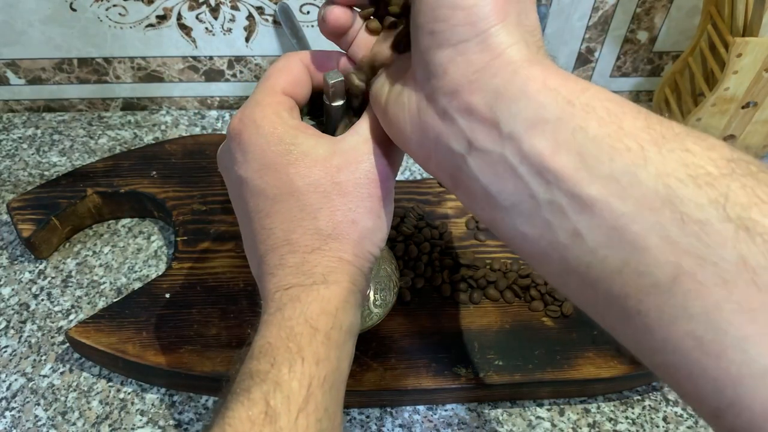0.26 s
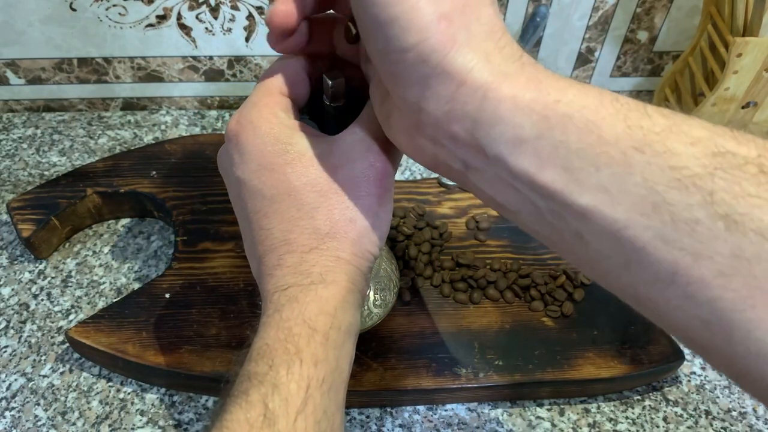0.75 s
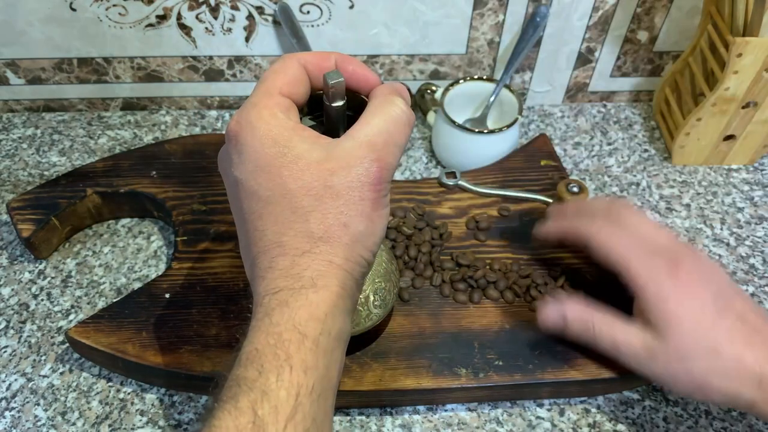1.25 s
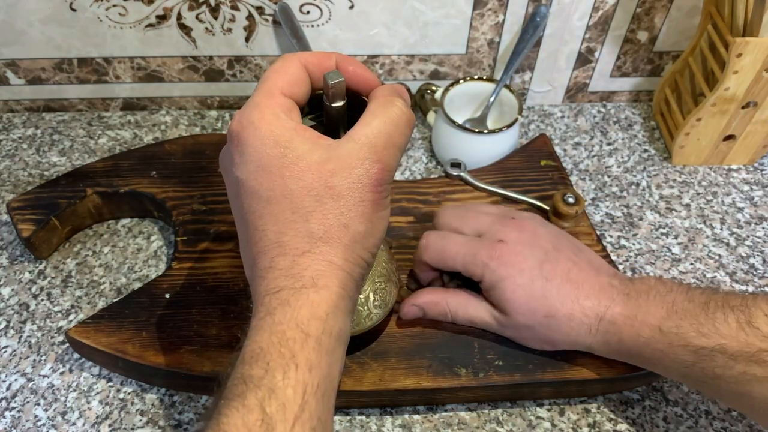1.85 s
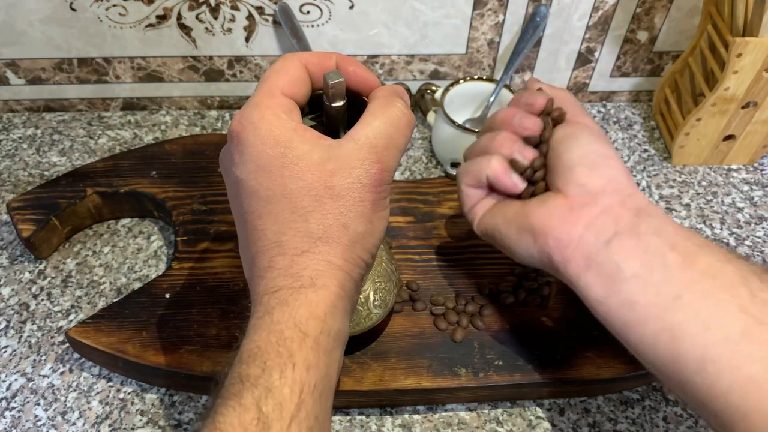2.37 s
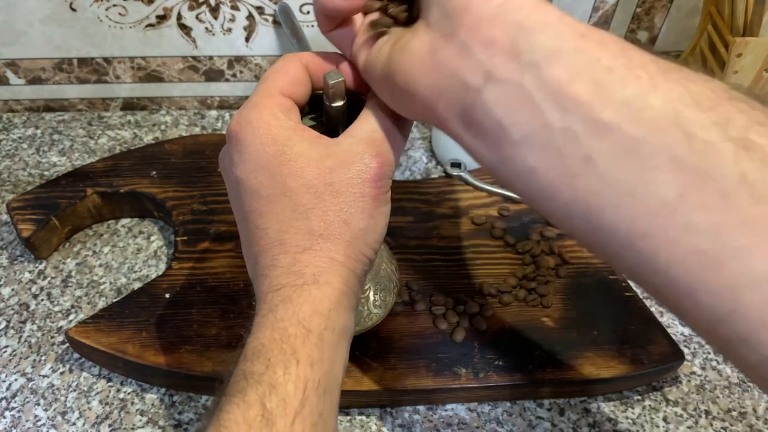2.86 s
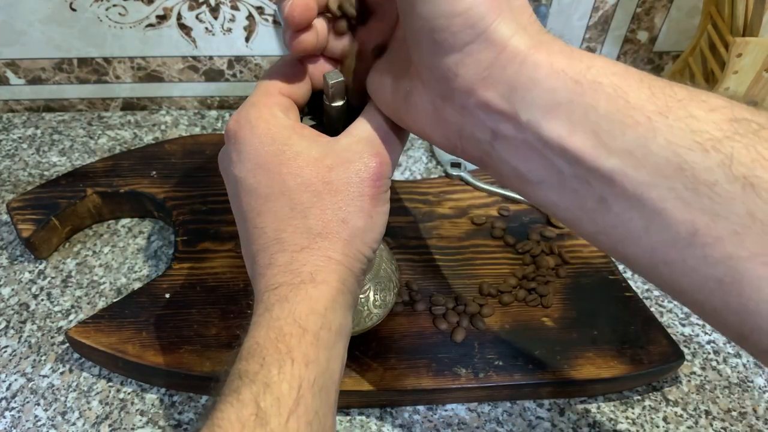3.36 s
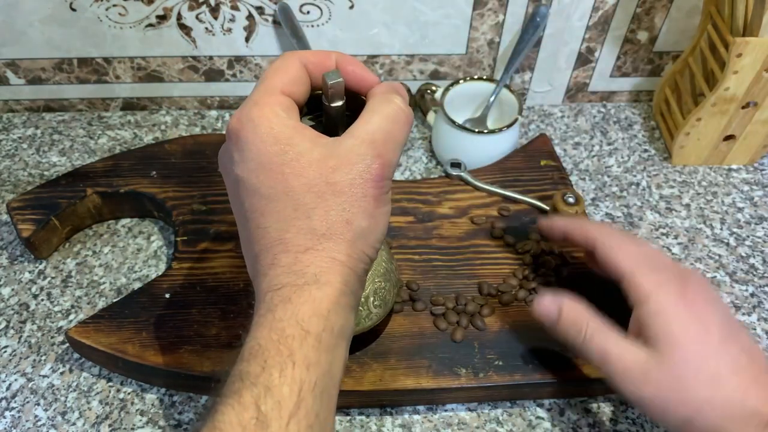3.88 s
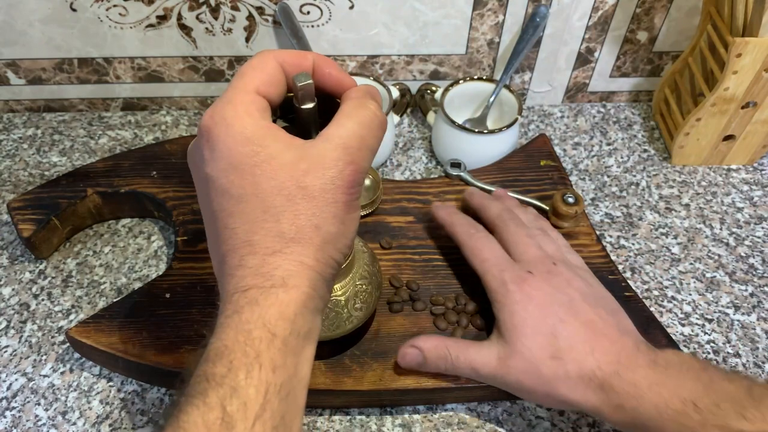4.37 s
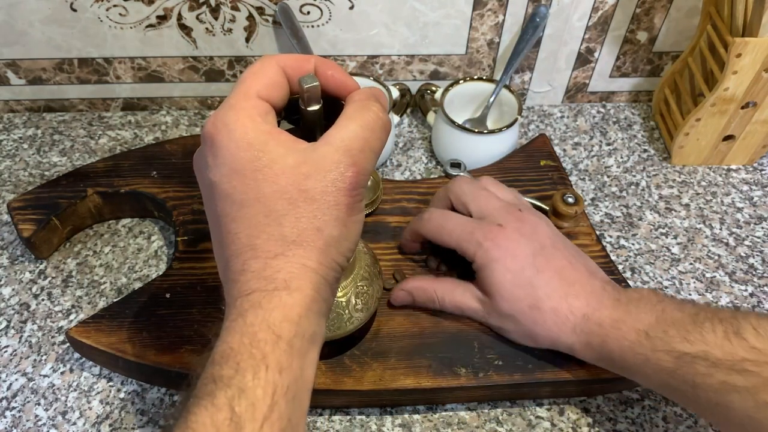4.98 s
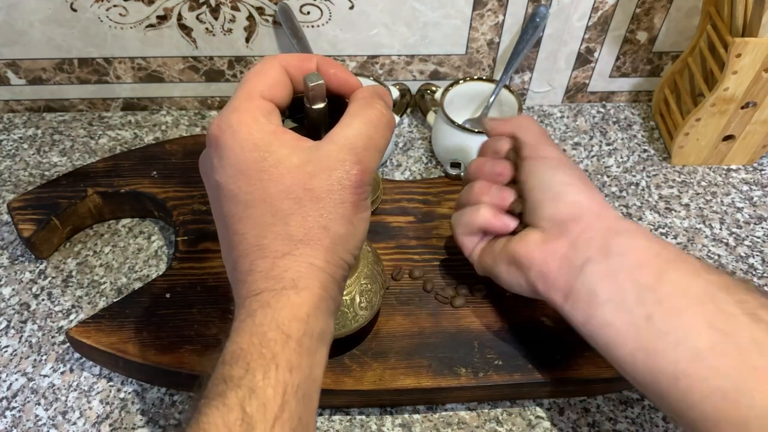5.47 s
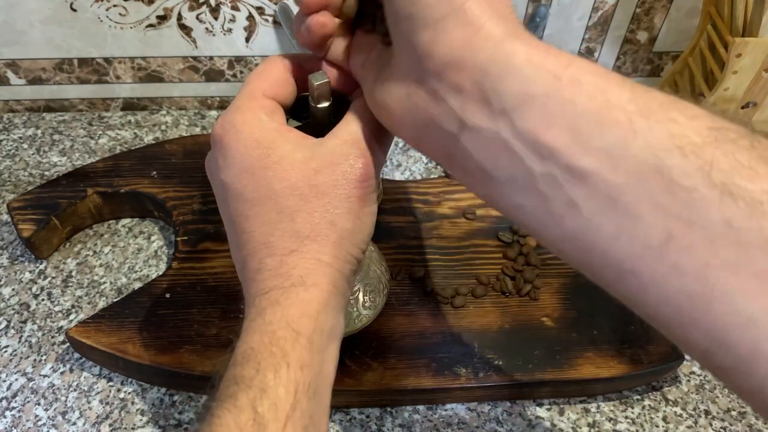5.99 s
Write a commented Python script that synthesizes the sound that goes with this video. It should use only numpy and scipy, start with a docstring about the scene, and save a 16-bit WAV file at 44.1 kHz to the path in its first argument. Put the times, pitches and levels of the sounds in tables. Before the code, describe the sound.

Close, crisp clatter of beans dropping into a metal tube in three bursts, separated by quiet gritty scraping and dull bumps on wood.

```python
"""Coffee beans drop by the handful into a hand-held brass grinder: clicks strike decaying tube resonances.
Between pours a hand sweeps beans over the wooden board (random grit), beans tap it, and the hand bumps it.
Filtered noise makes the board's rumble, short diffuse reflections off the counter and tiles, and the room's hush.
A close two-port microphone adds phase shifts and unlike scatter; its right port gets the treble slightly first."""
import sys
import numpy as np
from scipy import signal
from scipy.fft import rfft, irfft
from scipy.io import wavfile
from scipy.ndimage import uniform_filter1d

SR = 44100
rng = np.random.default_rng(int(sys.argv[2]) if len(sys.argv) > 2 else 0)


def wav_out(sig):
    """Save sig, one row per channel (or a flat mono array), as 16-bit PCM at SR to the path in sys.argv[1]."""
    wavfile.write(sys.argv[1], SR, np.round(np.clip(np.atleast_2d(sig).T, -1, 1) * 32767).astype(np.int16))


N = 274743

RISE_POWER, FALL_POWER = 0.6, 0.87  # 1 = straight, less = rounder, more = peakier
# Flurries of small contacts as a handful runs out. Each row: start in s, rise in s, fall in s, level in dB.
POURS = [(-0.1, 0.075, 0.18, -48.5), (0.17, .04, .08, -60), (0.24, .14, 0.065, -49.5),
         (0.4, 0.14, 0.48, -65), (0.58, 0.064, 0.08, -51.5), (0.7, 0.077, 0.13, -49),
         (0.9, .1, 0.13, -74.5), (3.0, 0.089, 0.063, -54), (3.13, 0.19, 0.092, -48),
         (3.44, 0.05, .12, -50.5), (6.06, 0.23, .2, -47)]


def pour_gain():
    """Strength of the falling stream of beans."""
    return swells(POURS, column=3)


# Bean hits that stand out. Each row: time in s, level in dB, hollow knock in dB against the tick,
# treble slant in dB per 4 kHz about 11 kHz.
BEAN_HITS = [(0.0094, -19, -25.5, -3), (0.021, -22.5, -35.5, -4), (0.0298, -15.5, -44, 8),
             (0.0445, -11.5, -33, -3), (0.0606, -26, -32, 0), (0.0926, -17, -41, 8), (0.107, -30, -29, 19),
             (0.1189, -12, -41, -1), (0.1509, -9, -36.5, 2), (0.1815, -18.5, -34, 4),
             (0.2455, -15, -28.5, -1), (0.2711, -15.5, -27.5, 9), (0.2786, -21.5, -24.5, 5),
             (0.288, -22, -34.5, 3), (0.3135, -25.5, -26, 2), (0.3266, -24.5, -29, -4),
             (0.3403, -16, -28.5, -2), (0.3509, -11.5, -37, 0), (0.38, -12.5, -43, 4),
             (0.386, -14.5, -41, 9), (0.399, -14, -41, 0), (0.4072, -21, -42, 6), (0.4134, -27, -47, 10),
             (0.4496, -18, -45, 2), (0.458, -30, -28, 3), (0.5121, -22, -30.5, -4),
             (0.5448, -21.5, -29, -5), (0.594, -17, -31, 2), (0.6304, -14, -44.5, 14),
             (0.6476, -20, -46, 5), (0.6636, -14, -39, 16), (0.6757, -22, -41, 2), (0.6804, -17, -47, 14),
             (0.7196, -17.5, -26, -9), (0.7274, -18.5, -27.5, -8), (0.7354, -18.5, -27, -7),
             (0.745, -23.5, -24.5, 0), (0.7555, -15, -31.5, 0), (0.7674, -16, -33.5, 9),
             (0.7857, -12.5, -40, 11), (0.791, -24, -25.5, -1), (0.8126, -21, -42.5, -16),
             (0.8277, -12.5, -33.5, -2), (0.8664, -34, -43, 8), (0.8869, -19, -45, -3),
             (0.8948, -24.5, -28, -4), (0.9193, -35.5, -25, -8), (0.9464, -58, -15, -2),
             (0.9731, -17, -24.5, -13), (1.0083, -30.5, -26, -8), (1.037, -31, -31, 0),
             (1.0588, -39.5, -41, -7), (1.5361, -44, -20, 20), (1.8198, -39, -32, 6), (1.889, -37, -18, 12),
             (2.0587, -35, -18.5, -2), (2.117, -55, -14.5, -1.5), (2.4024, -47.5, -32.5, -11),
             (2.4258, -46, -31, 4), (2.4416, -41.5, -27, 7), (2.4614, -21.5, -43, 29.5),
             (2.4742, -31, -37, 3), (2.5146, -33.5, -37, 6), (2.6394, -36, -56, -5.5),
             (2.6681, -35, -46, -9.5), (2.819, -55, -33, -2.5), (2.9015, -60, -32.5, 0.5),
             (3.0068, -23, -21, -7.5), (3.0355, -25, -27.5, -7), (3.048, -38, -33, 4),
             (3.0644, -41, -36.5, -4), (3.0785, -34, -45, 8), (3.0888, -21.5, -31, -6),
             (3.1134, -28, -40, 2), (3.1208, -24, -47, 8), (3.1457, -19, -33, 1), (3.1519, -16, -28, 12),
             (3.168, -19.5, -45.5, -2), (3.1826, -16.5, -27.5, 8), (3.2166, -19, -25.5, -6),
             (3.2249, -20.5, -32.5, 8), (3.2359, -20, -43, -7), (3.249, -22, -43, 8),
             (3.2571, -16, -24.5, -6), (3.271, -19, -37, 7), (3.279, -15, -44.5, 9),
             (3.303, -22.5, -43, -10), (3.318, -21, -61, 9), (3.334, -25.5, -41, 12),
             (3.3623, -22.5, -20, -15), (3.3841, -17.5, -31, -7), (3.3947, -15.5, -26, -4),
             (3.4164, -17.5, -37, 9), (3.4304, -21, -30.5, 10), (3.4359, -13, -35.5, -2),
             (3.46, -21, -39, 7), (3.491, -23.5, -27, -3), (3.5126, -11.5, -31, 5),
             (3.526, -15.5, -26, -10), (3.5534, -33.5, -18, 1.5), (3.5643, -32, -22.5, -12.5),
             (3.6516, -24, -36, 6), (4.2822, -54, -14, 5), (4.5111, -33.5, -18, 12),
             (5.0203, -24, -22.5, 6), (5.0719, -29, -43, 14), (5.0973, -35.5, -19.5, 3),
             (5.1646, -27.5, -48, 0), (5.3431, -40, -26, -13), (5.5581, -50, -18.5, -3),
             (5.5892, -33.5, -40, 11), (5.6136, -42, -37, -2), (5.6241, -30.5, -41, 4),
             (6.0183, -34.5, -55, -4), (6.0507, -38, -51, -8), (6.0695, -21, -26.5, 0),
             (6.0791, -23, -29, 0), (6.106, -44, -36, 0), (6.129, -19, -23, -1), (6.1399, -13, -29.5, 2),
             (6.1744, -20, -26.5, -2), (6.187, -17, -43, -5), (6.2048, -25, -48, 2)]
# Damped brass tube and beans, tick part. Each row: frequency in Hz, width in Hz, relative level in dB.
TICK_MODES = [(4680, 640, -20), (6740, 230, -34.5), (7850, 420, -3.5), (9210, 230, -4.5), (10250, 420, -1),
              (11630, 830, 3.5), (12870, 550, 1), (14100, 430, 1.5), (16000, 700, 0)]
# Hollow knock of the tube. Each row: frequency in Hz, width in Hz, relative level in dB.
KNOCK_MODES = [(780, 930, -1), (1430, 880, -2), (2210, 233, 0.5), (2514, 142, 2), (3000, 98, -6),
               (4340, 1200, -11.5)]
MODE_CHANCE_DB = 3.0  # spread of a mode's strength from hit to hit
CHATTER_T60_S, REBOUNDS_PER_S, REBOUND_SPREAD_DB = 0.021, 900.0, 2.0


def beans(pour):
    """Hits and stream strike every tube mode; rows: direct sound, scatter to left port, to right port."""
    time_s, level_db, knock_db, slant_db = np.transpose(BEAN_HITS)
    at = sample_of(time_s)
    modes = TICK_MODES + KNOCK_MODES
    chance_db = MODE_CHANCE_DB * rng.standard_normal((len(at), len(modes), 3))
    stream = pour * grains(per_s=300.0, spread_db=2.0)
    rebounds = 0.4 + 0.66 * np.abs(grains(REBOUNDS_PER_S, REBOUND_SPREAD_DB))
    chatter = rebounds * rng.standard_normal((6, N))
    tick, knock = np.zeros((3, N)), np.zeros((3, N))
    for k, (hz, width_hz, mode_db) in enumerate(modes):
        hollow = k >= len(TICK_MODES)
        if hollow:
            body_db, stream_db = knock_db + 3, -24
        else:
            slant = np.clip((hz - 11000) / 4000, -.5, .5)  # hard, glancing hits favour the top modes
            body_db, stream_db = slant * slant_db - 7, -8
        clicks = np.tile(amp(stream_db) * stream, (3, 1))
        clicks[:, at] += amp(level_db + body_db + chance_db[:, k].T)
        # dying chatter between bean and wall follows each contact
        trail = signal.lfilter([0, 1], [1, -decay(CHATTER_T60_S)], np.abs(clicks[0]))
        blows = clicks * [[.55], [.4], [-.4]] + 0.12 * trail * chatter[k % 2::2]
        rings = (-1) ** k * amp(mode_db) * resonance(blows, hz, width_hz)
        if hollow:
            knock += rings
        else:
            tick += rings
    return above(tick, hz=3750) + above(knock, hz=650)


RING_WIDTH_HZ, RING_TILT_DB_PER_OCTAVE = 350, 9


def bean_rings():
    """Each standout bean also rings briefly at one of 24 pitches, dealt at random."""
    time_s, level_db = np.transpose(BEAN_HITS)[:2]
    dealt = rng.integers(0, 24, len(time_s))
    rings = np.zeros(N)
    for k, hz in enumerate(np.geomspace(4500, 15500, 24)):
        ring_db = level_db - 6.5 + RING_TILT_DB_PER_OCTAVE * np.log2(hz / 10000)
        clicks = np.zeros(N)
        clicks[sample_of(time_s)] = amp(ring_db) * (dealt == k)
        rings += resonance(clicks, hz, RING_WIDTH_HZ)
    return above(rings, hz=3048) * [[1], [.6], [-.6]]


# Hand sweeping beans over wood. Each row: start in s, rise in s, fall in s, bright level in dB, dull level in dB.
SWEEPS = [(1.33, 0.078, 0.22, -72, -82.5), (1.5, 0.25, .12, -61.5, -61), (1.72, 0.19, .11, -50.5, -59),
          (2.0, 0.071, 0.12, -68, -67.5), (4.175, 0.024, .1, -65, -68), (4.28, 0.066, 0.056, -88, -69),
          (4.41, .06, 0.29, -60, -62.5), (4.62, 0.083, 0.084, -57.5, -62), (4.9, 0.13, 0.091, -53.5, -58.5),
          (4.98, 0.19, 0.16, -49, -60), (5.26, 0.061, 0.06, -68.5, -65.5), (5.57, 0.042, 0.052, -54.5, -80)]
# Bright sweep colour. Each row: frequency in Hz, relative density in dB per Hz.
SWEEP_COLOUR = [(3000, -8), (5000, -8.5), (7000, 0), (9500, -2), (12000, 2), (14500, 5.5), (16000, -3)]
# Board resonances, rubbed or tapped. Each row: frequency in Hz, width in Hz, relative level in dB.
SCRAPE_MODES = [(980, 930, -10.5), (1420, 360, -2.5), (2210, 450, -9), (2990, 840, 0.5), (3920, 200, -10)]
ROLLS_PER_S, ROLL_DB = 60.0, -5  # beans ticking as they roll under the hand


def sweeps():
    """Skin and rolling beans on wood: bright grit, and board resonances that come and go under the hand."""
    grit = grains(per_s=2700.0, spread_db=5.0) * rng.choice([-1, 1], (3, N))
    grit = grit + .5 * rng.standard_normal((3, N))
    grit += amp(ROLL_DB) * grains(ROLLS_PER_S, spread_db=2.0) * [[1], [.5], [-.5]]
    wood = np.zeros((3, N))
    for hz, width_hz, mode_db in SCRAPE_MODES:
        rubbed = rms_one(resonance(np.diff(grit, prepend=0), hz, width_hz))
        wood += amp(mode_db) * wobble(spread_db=5.0, hz=4.25) * rubbed
    dull = rms_one(above(wood, hz=670))
    bright = colour(grit * wobble(spread_db=1.5, hz=29.2), SWEEP_COLOUR)
    return swells(SWEEPS, column=3) * bright + swells(SWEEPS, column=4) * dull


# Loose beans tap the board. Each row: time in s, level in dB.
TAPS = [(2.142, -47), (2.2162, -54.5), (4.1574, -71), (4.4407, -34), (4.4814, -59), (5.3431, -46.5),
        (5.387, -60), (5.4066, -51)]
TAP_T60_S, TAP_CRACK_DB = 0.018, -9


def taps():
    """A short dying noise burst is heard directly and through the board's resonances."""
    burst = signal.lfilter([1], [1, -decay(TAP_T60_S)], impulses(TAPS)) * rng.standard_normal((3, N))
    rings = np.zeros((3, N))
    for hz, width_hz, mode_db in SCRAPE_MODES:
        rings += amp(mode_db - 11) * resonance(np.diff(burst, prepend=0), hz, width_hz)
    return above(rings + amp(TAP_CRACK_DB) * burst, hz=830)


# Heel of the hand lands on the board. Each row: time in s, level in dB.
BUMPS = [(4.159, -28.5), (4.437, -28.5)]
# Board on its feet. Each row: frequency in Hz, relative level in dB, 60 dB decay in s, delay in s.
BOARD_MODES = [(59.5, 0, 0.26, 0.0138), (113, -6.5, 0.33, 0.0013), (199.5, 4.5, 0.05, 0.00587),
               (422, -10.5, 0.077, 0.00618)]
# Loose things shaking after a bump. Each row: frequency in Hz, relative density in dB per Hz.
SHUDDER_COLOUR = [(80, -2), (200, 4.5), (420, 2.5), (700, -16), (1100, -41)]
PALM_HZ, SHUDDER_T60_S, SHUDDER_DB = 449, 0.25, -12.0


def bumps():
    """Soft blows ring the board's modes, each after its own delay; loose things shake along."""
    blows = impulses(BUMPS)
    rings = np.zeros((3, N))  # row 0 only: no scatter
    for hz, mode_db, t60_s, delay_s in BOARD_MODES:
        late = np.roll(blows, sample_of(delay_s))
        rings[0] += amp(mode_db) * resonance(late, hz, np.log(1000) / np.pi / t60_s)
    palm = signal.butter(2, PALM_HZ, fs=SR, output="sos")  # flesh cushions the contact
    dying = uniform_filter1d(signal.lfilter([1], [1, -decay(SHUDDER_T60_S)], blows), size=300)
    shudder = amp(SHUDDER_DB) * dying * colour(rng.standard_normal((3, N)), SHUDDER_COLOUR)
    return signal.sosfilt(palm, rings) + shudder


# Continuous rumble of the counter. Each row: time in s, deep level in dB, woody level in dB.
RUMBLE = [(0.0, -58.5, -61), (0.38, -65, -69.5), (0.85, -62, -66), (1.21, -67.5, -72), (1.86, -63.5, -66.5),
          (2.19, -64, -71), (2.91, -63.5, -74.5), (3.36, -65, -64), (3.7, -70, -73.5), (3.95, -64.5, -77.5),
          (4.15, -60.5, -68), (4.34, -58.5, -59), (4.75, -53.5, -65.5), (4.93, -59, -69),
          (5.15, -52.5, -75), (5.52, -52.5, -57), (6.23, -52.5, -62)]
# Board dragged or leaned on. Each row: start in s, rise in s, fall in s, deep level in dB, woody level in dB,
# judder level in dB.
DRAGS = [(1.35, 0.096, 0.057, -56.5, -74.5, -78), (1.54, 0.07, 0.11, -71, -63, -58),
         (1.8, 0.22, 0.065, -58, -62, -71.5), (4.28, 0.11, 0.0445, -77, -47, -54),
         (4.95, .15, .25, -63, -51, -60.5)]
# Deep rumble colour. Each row: frequency in Hz, relative density in dB per Hz.
DEEP_COLOUR = [(20, -19.5), (35, 3.5), (54, 12.5), (75, -2), (100, 3.5), (150, -55.5)]
# Woody rumble colour. Each row: frequency in Hz, relative density in dB per Hz.
WOODY_COLOUR = [(70, 1.5), (112, 9), (150, 0.5), (205, 2), (290, -14), (400, -59)]
# Judder of the board on the counter. Each row: frequency in Hz, relative density in dB per Hz.
JUDDER_COLOUR = [(200, -10), (290, -1.5), (360, -0.5), (430, -1.5), (600, -27), (900, -41.5)]
RUMBLE_WANDER_DB = 0.5
POUR_WOODY_DB, POUR_JUDDER_DB = -14, -10.5  # falling beans shake the board, relative to the pour gain


def board_rumble(pour):
    """Handling and pouring shake the wood: three noise bands with wandering level."""
    deep = in_time(RUMBLE, column=1)
    woody = in_time(RUMBLE, column=2) + amp(POUR_WOODY_DB) * pour
    judder = amp(POUR_JUDDER_DB) * pour
    bands = [(deep, 3, DEEP_COLOUR), (woody, 4, WOODY_COLOUR), (judder, 5, JUDDER_COLOUR)]
    rumble = np.zeros((3, N))
    for steady, drag_column, shape in bands:
        gain = steady * wobble(RUMBLE_WANDER_DB, hz=12.0) + swells(DRAGS, drag_column)
        rumble += gain * colour(rng.standard_normal((3, N)), shape)
    return rumble


REFLECTIONS_T60_S, REFLECTIONS_DB = 0.084, -8


def counter_reflections(x):
    """Short diffuse reflections off the counter and tiles: dying noise on three unrelated paths."""
    t = np.arange(SR // 2) / SR
    tail = rng.standard_normal((3, len(t))) * amp(-60 * t / REFLECTIONS_T60_S) * (t > .003)
    tail = signal.lfilter([1], [1, -.3], tail)  # surfaces dull the top
    tail /= np.sqrt(np.sum(tail ** 2) / 3)
    return amp(REFLECTIONS_DB) * signal.fftconvolve(x[None], tail, axes=1)[:, :N]


# Room hush. Each row: frequency in Hz, relative density in dB per Hz.
AIR_COLOUR = [(180, -24), (300, -10.5), (742, -21.5), (923, -21), (1020, -22), (1450, -27.5), (2000, -25.5),
              (2320, -30.5), (2520, -25.5), (7890, -37.5), (8580, -37.5), (11200, -26), (16500, -36)]
AIR_DB = -77


def room_air():
    """Steady coloured noise of the quiet room."""
    return amp(AIR_DB) * colour(rng.standard_normal((3, N)), AIR_COLOUR)


# Microphone ports. Each row: frequency in Hz, phase lead of the right in radians, left-right likeness 0-1.
PORTS = [(0, 0, .98), (120, 0, .86), (300, 0, .66), (700, -.6, .4), (2000, -1.6, .55), (3400, -3.2, .65),
         (4200, -5.4, .5), (6200, -5.8, .5), (8300, -3.2, .93), (11000, 0, .9), (15900, 6.3, .9),
         (22050, 14.2, .9)]


def ports(rows):
    """Both ports share the direct sound with a phase shift; the scattered rest is their own."""
    hz, p = np.arange(N // 2 + 1) * SR / N, np.array(PORTS)
    lead = np.interp(hz, p[:, 0], p[:, 1])
    alike = np.interp(hz, p[:, 0], p[:, 2])
    direct, *own = rfft(rows)
    shared = np.exp(.5j * lead * [[-1], [1]]) * direct
    return irfft(np.sqrt(alike) * shared + np.sqrt(1 - alike) * np.array(own), N)


def amp(db):
    """dB to gain."""
    return 10 ** (np.asarray(db) / 20)


def decay(t60_s):
    """Per-sample factor that falls 60 dB in t60_s."""
    return amp(-60 / (t60_s * SR))


def sample_of(time_s):
    """Seconds to nearest sample."""
    return np.round(np.asarray(time_s) * SR).astype(int)


def impulses(rows):
    """One click per row of time in s, level in dB."""
    time_s, level_db = np.transpose(rows)
    clicks = np.zeros(N)
    clicks[sample_of(time_s)] = amp(level_db)
    return clicks


def rms_one(x):
    """Scale to rms 1."""
    return x / np.sqrt(np.mean(x ** 2) + 1e-20)


def in_time(rows, column):
    """Gain curve from a dB column, straight in dB between times."""
    rows = np.array(rows)
    return amp(np.interp(np.arange(N) / SR, rows[:, 0], rows[:, column]))


def swells(rows, column):
    """Each gesture rises to its peak and falls away; gestures add in power, then are smoothed."""
    t, power = np.arange(N) / SR, np.zeros(N)
    for row in rows:
        start, top, end = np.cumsum(row[:3])
        bend = np.where(t < top, RISE_POWER, FALL_POWER)
        shape = np.interp(t, [start, top, end], [0, 1, 0]) ** bend
        power += (amp(row[column]) * shape) ** 2
    return uniform_filter1d(np.sqrt(power), size=300)


def wobble(spread_db, hz):
    """Gain that wanders at random around the given rate."""
    shape = [(hz / 6, -12), (hz, 0), (hz * 4, -12), (hz * 30, -45)]
    return amp(spread_db * colour(rng.standard_normal(N), shape))


def colour(x, points):
    """Shape by a spectrum, straight in dB on log frequency; rms 1."""
    hz, p = np.arange(1, N // 2 + 2) * SR / N, np.array(points)
    gain = amp(np.interp(np.log(hz), np.log(p[:, 0]), p[:, 1]))
    return rms_one(irfft(rfft(x) * gain, N))


def resonance(x, hz, width_hz):
    """Two-pole peak whose click response starts near height 1."""
    r, w = np.exp(-np.pi * width_hz / SR), 2 * np.pi * hz / SR
    return signal.lfilter([0, np.sin(w)], [1, -2 * r * np.cos(w), r * r], x + 1e-18)


def grains(per_s, spread_db):
    """Random contacts of uneven size and sign; rms 1."""
    sizes = amp(spread_db * np.minimum(rng.exponential(1, N), 4)) * rng.choice([-1, 1], N)
    return rms_one(sizes * (rng.random(N) < per_s / SR))


def above(x, hz):
    """High-pass: small bodies radiate nothing low."""
    return signal.sosfilt(signal.butter(3, hz, "high", fs=SR, output="sos"), x)


def scene():
    """Beans, hand, board and room reach the two ports."""
    pour = pour_gain()
    near = beans(pour) + bean_rings() + sweeps() + taps()
    board = bumps() + board_rumble(pour)
    return ports(near + board + counter_reflections(near[0]) + room_air())


CUTOFF_HZ = 16800


def record(dry):
    """Steep low-pass, 60 dB down from the cutoff upward."""
    return signal.sosfilt(signal.cheby2(12, 60, CUTOFF_HZ, fs=SR, output="sos"), dry)


dry = scene()
out = record(dry)
wav_out(out)
```